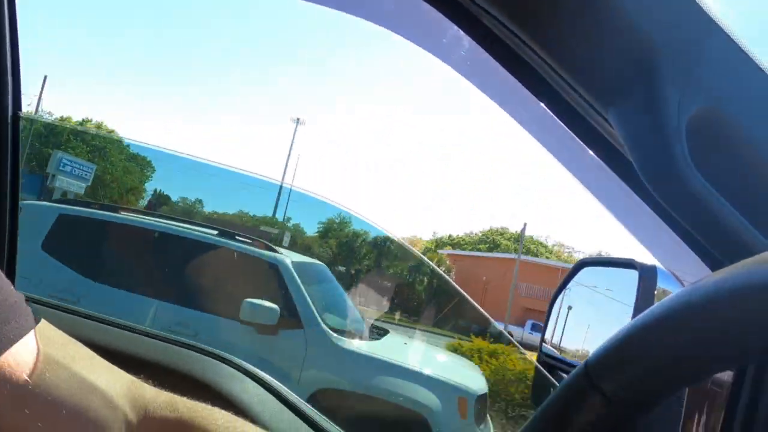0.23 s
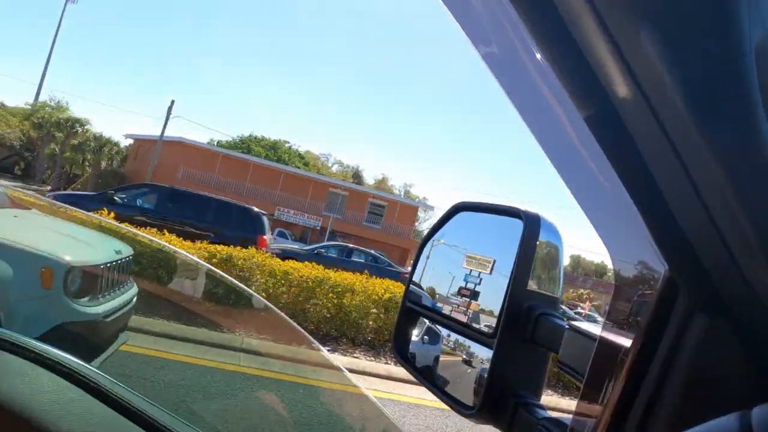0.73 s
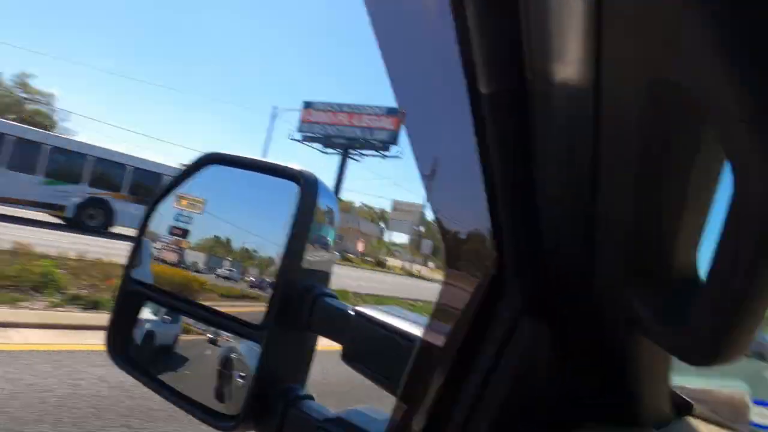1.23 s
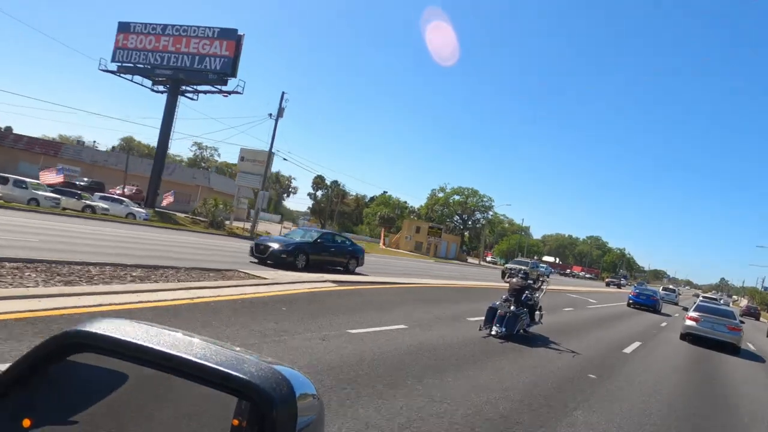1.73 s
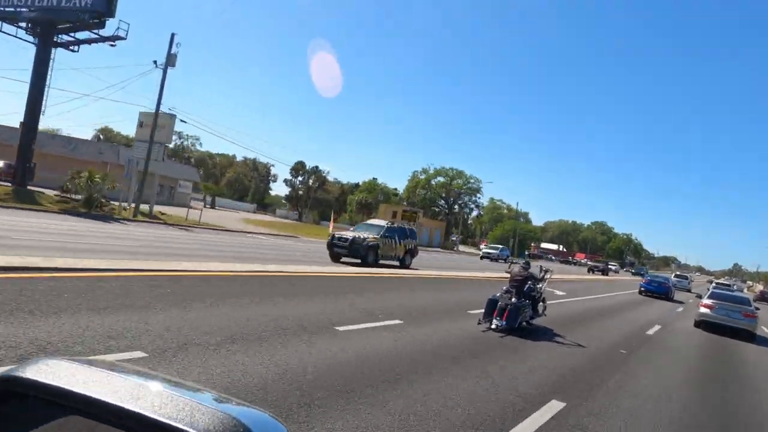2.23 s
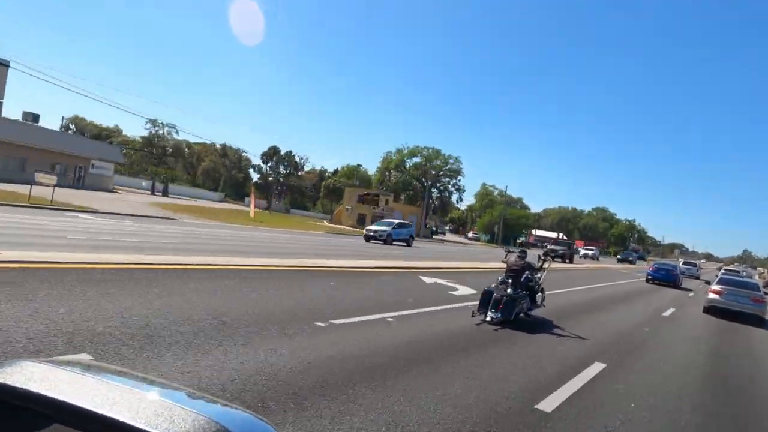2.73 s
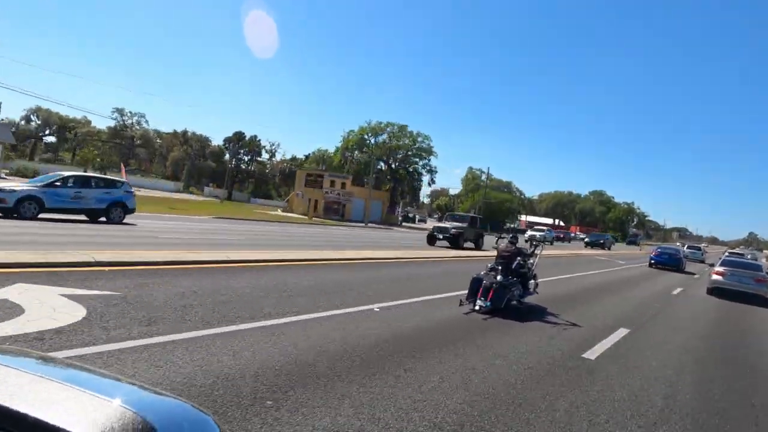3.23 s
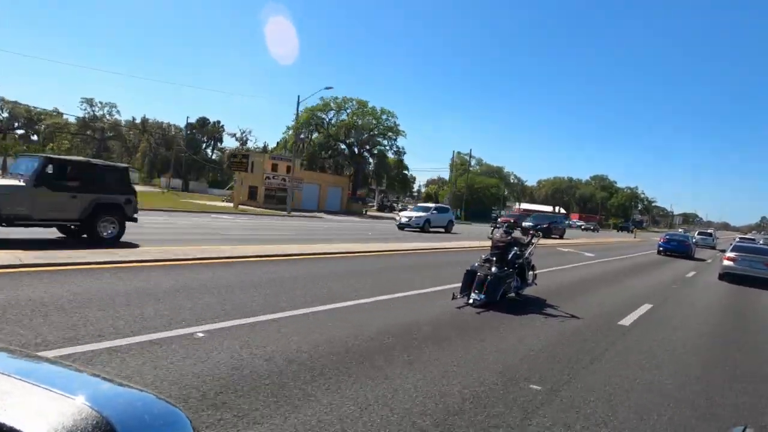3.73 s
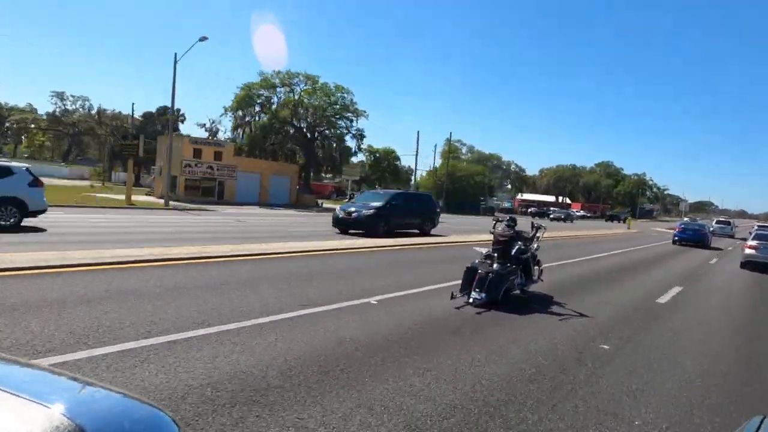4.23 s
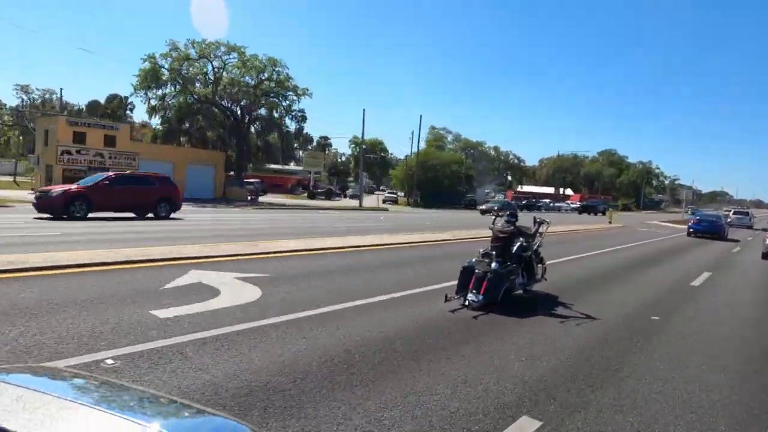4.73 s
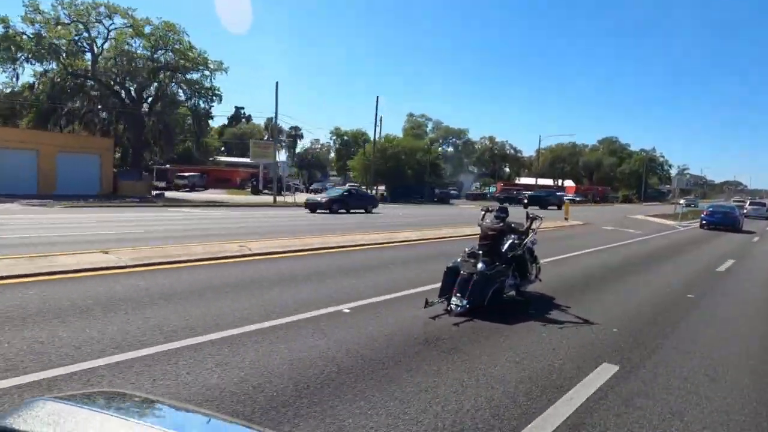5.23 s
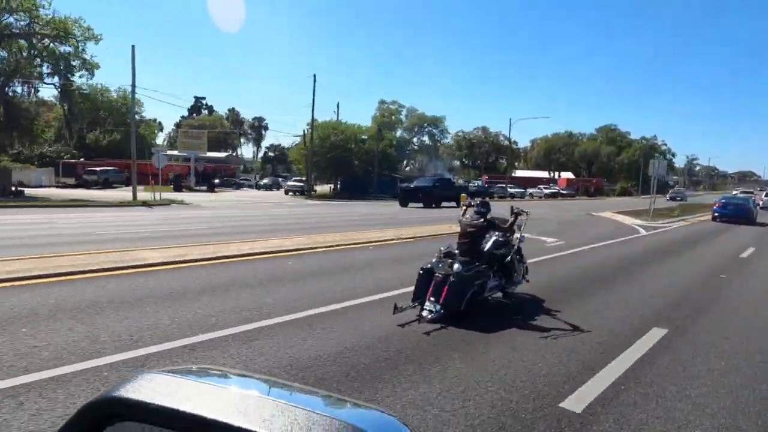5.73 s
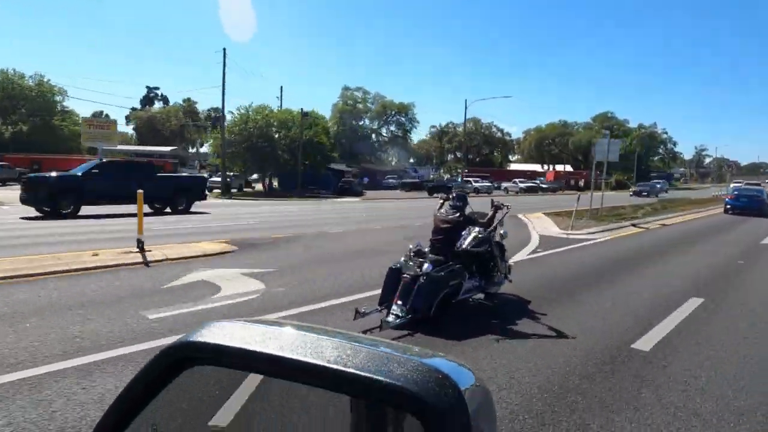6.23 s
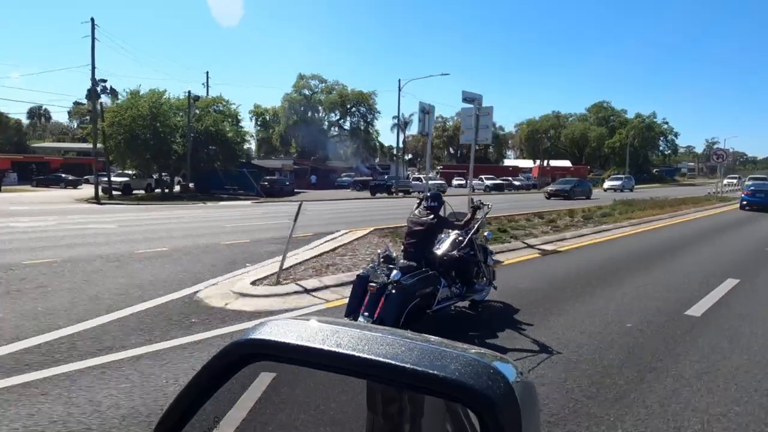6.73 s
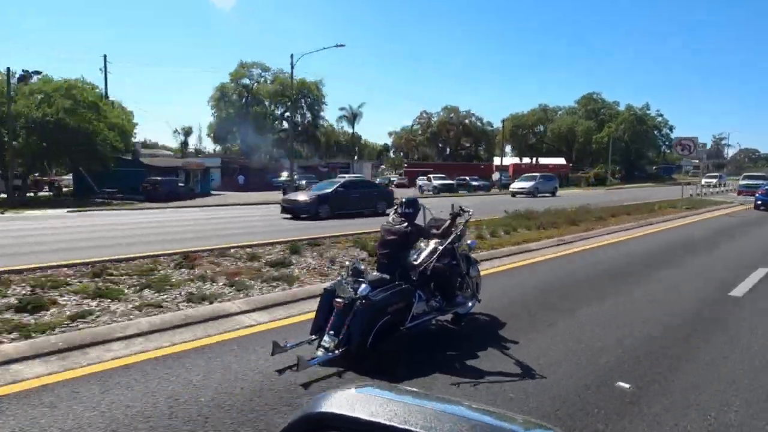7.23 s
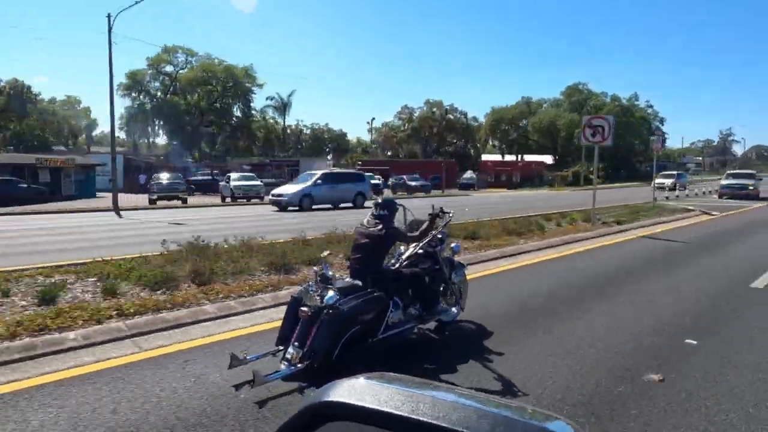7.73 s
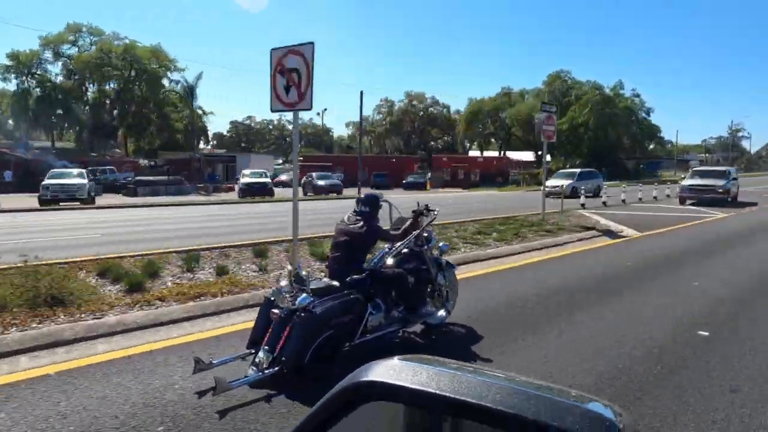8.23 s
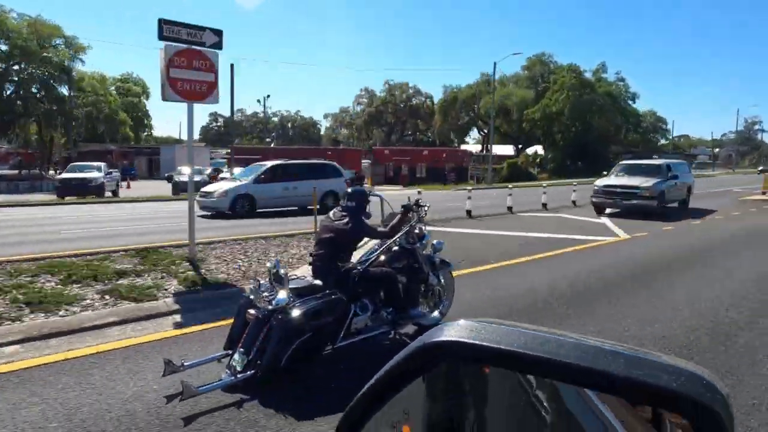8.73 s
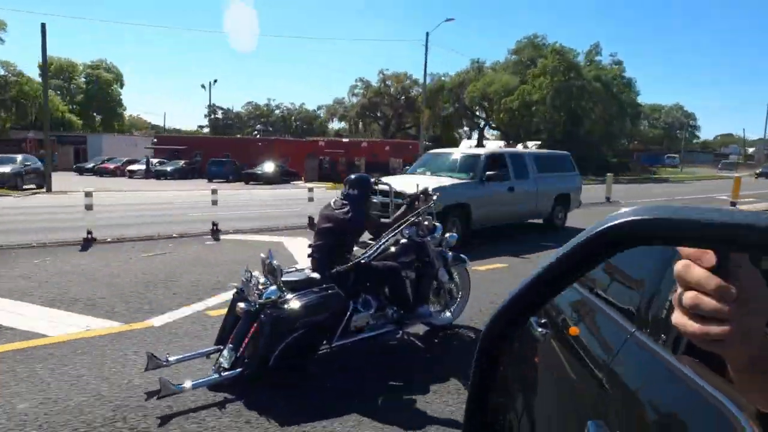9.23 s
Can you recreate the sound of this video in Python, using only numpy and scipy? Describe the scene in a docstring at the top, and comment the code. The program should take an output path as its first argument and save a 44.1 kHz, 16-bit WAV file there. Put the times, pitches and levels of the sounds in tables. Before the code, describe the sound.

A low road drone and window hiss are heard briefly from a truck's cab. Then the microphone is pushed outside with a blast of air, and heavy, fluttering wind batters it for the rest of the time, with tyre and traffic noise beneath. The rapid, lopsided crackle of a two-cylinder motorcycle nearby cuts through the gusts, builds, and drops away shortly before the end.

```python
"""First comes the boom of tyres, heard from the cab of a moving pickup through the opening window.
About 1.5 s in, the microphone is pushed out into the slipstream with a thump: eddies buffet it,
and air hisses and spits past its grille. A two-cylinder motorcycle runs alongside,
and the cracks of its uneven exhaust beat cut through the wind."""
import sys
import numpy as np
from scipy import signal
from scipy.fft import rfft, irfft, next_fast_len
from scipy.io import wavfile
from scipy.ndimage import uniform_filter1d, map_coordinates

SR = 44100
rng = np.random.default_rng(int(sys.argv[2]) if len(sys.argv) > 2 else 0)


def materialize(psi):
    """Save the field psi as 16-bit PCM at rate SR to the path in sys.argv[1].

    A 1-D psi becomes a single channel; in a 2-D psi each row is a channel.
    """
    bounded = np.clip(np.atleast_2d(psi).T, -1, 1)
    quanta = np.round(bounded * 32767).astype(np.int16)
    wavfile.write(sys.argv[1], SR, quanta)


N = 417186

# Wind on the microphone. Each row: time in seconds, then buffeting, hiss and sizzle levels in dB.
WIND_LEVELS = [(1.47, -10, -25, -50), (1.505, -14, -39, -45), (1.54, -10, -36, -43),
               (1.59, -8.5, -28.5, -39), (1.7, -13.5, -31.5, -38.5), (1.81, -16.5, -31, -33.5),
               (1.95, -19.5, -33, -34.5), (2.06, -20.5, -34.5, -37), (2.12, -17.5, -31, -43),
               (2.25, -21, -36, -47), (2.5, -14, -33.5, -45.5), (2.9, -18, -32.5, -40),
               (3.2, -13.5, -32.5, -45), (3.37, -15, -31.5, -39), (3.45, -17.5, -34.5, -49.5),
               (3.65, -17.5, -33, -39.5), (3.8, -17.5, -34, -48), (4.25, -14, -32.5, -43),
               (4.7, -16.5, -31.5, -42), (5.4, -16, -30.5, -40.5), (6.1, -15.5, -31, -40),
               (6.75, -16, -30.5, -39.5), (7.1, -13, -30.5, -38), (7.47, -20, -32, -39),
               (8.05, -14, -28.5, -35), (8.4, -16.5, -31.5, -38), (9, -14.5, -29.5, -40),
               (9.3, -16.5, -31.5, -41.5), (9.46, -12, -30.5, -45)]
# Eddies build and break off. Each row: peak time in seconds, buffeting lift in dB, hiss lift in dB.
GUST_LIFTS = [(1.52, 0, 0), (1.556, -5, 8.5), (1.59, 3, 5), (1.662, 1, 6.5), (1.695, 2.5, 6.5),
              (1.76, 1.5, 2), (1.8, 10, -1), (1.85, 4.5, 6), (1.91, 5, -1), (2.175, 7, -0.5), (2.49, 3, 4),
              (2.74, 12.5, -4), (2.85, 5, 2.5), (3.0, -3, 3.5), (3.07, 2, 5.5), (3.15, 3, 2),
              (4.059, 8.5, 4.5), (4.43, 2.5, 1), (4.85, 6, 1), (4.99, 5, -1), (5.08, 3.5, 0),
              (5.32, 7, 0.5), (5.38, -3, -2), (6.21, 5, 3), (6.31, 2, 2.5), (6.64, 1.5, 2.5),
              (6.95, 3, 2.5), (7.22, -1, 1), (7.275, -8, -2), (7.31, 7.5, -1), (7.41, 5, 0), (7.6, 8.5, 1),
              (7.789, 5, -0.5), (8.0, 3.5, 0), (8.556, 3, 5.5), (9.39, 2, 0.5)]
# The flow leaves the grille. Each row: time in seconds, depth in dB of which each band takes a share.
FLOW_LULLS = [(1.62, 16), (1.82, 6.5), (1.87, 7.5), (2.11, 10), (2.53, 9), (2.765, 10), (2.89, 8),
              (3.1, 5.5), (4.095, 9), (4.88, 7.5), (5.105, 2), (6.24, 3), (6.8, 7.5), (6.99, 12), (7.2, 9),
              (7.345, 6.5), (7.44, 5.5), (7.86, 3.5), (8.61, 5.5)]
# Hard eddies on the diaphragm. Each row: start in seconds, strength in dB.
HARD_EDDIES = [(1.511, -13.5), (1.541, -3.5), (1.652, -3), (1.838, -3.5), (1.889, -3.5), (2.057, -10),
               (2.248, -10.5), (2.17, -6), (2.354, -5.5), (2.729, -1), (2.904, -10.5), (2.991, -10),
               (4.048, -4), (4.187, -6.5), (4.41, -4.5), (4.676, -11), (5.366, 1), (5.414, -5),
               (5.579, -3.5), (6.421, -6), (6.772, -5), (6.912, -7), (6.96, -4.5), (7.011, -7.5),
               (7.155, -5.5), (7.274, -2.5), (7.312, -3.5), (8.388, -4), (8.89, -6)]
# Rasps at the grille. Each row: start in seconds, level in dB, length in seconds.
AIR_SPITS = [(1.523, -31, .006), (1.54, -26, 0.0047), (1.556, -32, 0.035), (1.654, -25.5, .012),
             (1.668, -26, 0.0056), (1.718, -30, 0.0045), (1.736, -31, 0.0065), (1.799, -24.5, .006),
             (1.807, -28.5, 0.0091), (1.954, -27, 0.018), (2.166, -29, 0.011), (2.349, -34.5, 0.0068),
             (2.709, -27.5, .008), (2.721, -29.5, 0.014), (2.937, -31.5, 0.014), (2.985, -33, .012),
             (3.075, -29.5, .008), (3.266, -26.5, .008), (4.433, -31.5, .008), (4.48, -27.5, 0.0095),
             (5.359, -31, .01), (6.422, -29, 0.0074), (6.913, -25.5, .008), (7.267, -25, .006),
             (7.298, -31, 0.0071), (7.414, -30.5, 0.0055), (7.647, -24, .006), (7.975, -24, .008),
             (8.238, -29, .01), (9.16, -32, 0.024), (9.382, -27, .025)]
# The exhaust alongside. Each row: time in seconds, crack strength in dB, snap strength in dB.
EXHAUST_LEVELS = [(1.9, -25, -43), (2.3, -14, -30), (3.2, -23.5, -34), (3.5, -16, -29), (3.8, -11.5, -24),
                  (4.15, -9, -25.5), (4.5, -9, -28), (5.2, -7, -23), (6, -6, -28.5), (6.6, -13.5, -33),
                  (7.3, -2, -33), (7.8, -3.5, -35), (8.2, -13, -37.5), (8.6, -34, -48)]
# Firings that snap harder. Each row: time in seconds, extra snap in dB.
HARD_FIRINGS = [(3.487, 15.5), (3.572, 7), (3.782, 2), (3.866, 6), (4.04, 6), (4.098, 4), (4.157, 9),
                (4.187, 5), (4.507, 7), (7.155, 11), (7.668, 8), (7.697, 14)]
# Inside the cab. Each row: time in seconds, then boom, tyre roar and window hiss levels in dB.
CAB_LEVELS = [(0, -23.5, -25.5, -34), (.45, -25, -26.5, -37.5), (.85, -26.5, -28, -38.5),
              (1.2, -24, -26, -37), (1.46, -22, -24, -35)]
# Small ticks of the cab's trim. Each row: start in seconds, level in dB, pitch in Hz.
TRIM_TICKS = [(.217, -38, 5800), (.665, -29, 4000), (.806, -44, 7000)]

# Tone colours at the microphone. Each row: frequency in Hz, relative level in dB.
BUFFET_SPECTRUM = [(41, -41.5), (70, -5.5), (118, 2), (221, 0.5), (373, -4), (501, -11.5), (600, -24.5),
                   (780, -22), (1320, -120)]  # large eddies
RUSH_SPECTRUM = [(290, -16.5), (500, -2.5), (1030, -12.5), (1400, -23), (1820, -51.5), (3080, -120)]  # small eddies and tyres
HISS_SPECTRUM = [(760, -7.5), (1300, 0.5), (2440, -2.5), (4500, -14.5), (5850, -33), (9900, -120)]  # air past the grille
SIZZLE_SPECTRUM = [(2600, -6.5), (4000, -2.5), (5000, -4.5), (7100, -14.5), (8700, -24), (11300, -36),
                   (13000, -43.5), (15000, -62.5), (17000, -120)]  # the top of the wind
SLAP_SPECTRUM = [(200, -38.5), (400, 6), (700, 4), (1300, -12.5), (2500, -16), (5000, -32), (9000, -51),
                 (15000, -100)]  # a hard eddy's puff
SPIT_SPECTRUM = [(600, -30), (1300, -2), (2500, 0), (4000, -6), (6000, -19), (9000, -40), (12500, -62),
                 (15000, -90)]  # rasping air
CRACK_SPECTRUM = [(1000, -39.5), (2200, -4.5), (3200, 3.5), (4800, -6.5), (6500, -15.5), (8000, -21.5),
                  (10000, -44.5), (12500, -54), (15000, -80)]  # an exhaust pulse
SNAP_SPECTRUM = [(2500, -26.5), (4000, -2), (5500, 1), (7500, -9.5), (10000, -27), (13000, -34.5),
                 (15000, -49.5)]  # its bright edge
BOOM_SPECTRUM = [(12, -55), (25, -20), (60, -15.5), (100, -13.5), (135, -6.5), (165, -4.5), (200, -7),
                 (300, -11), (450, -21), (600, -49), (900, -120)]  # cab air and body
ROAR_SPECTRUM = [(240, -35), (400, -7.5), (548, -14), (596, -4.5), (680, -7), (830, -7), (950, -11.5),
                 (1500, -23.5), (1950, -51), (3300, -120)]  # tyres from inside
GAP_SPECTRUM = [(760, -19), (1300, -1), (1620, 2.5), (2200, 0), (4000, -10), (6000, -18), (8700, -33),
                (11300, -42.5), (13000, -55), (15000, -72), (17000, -120)]  # air at the window gap
CHASSIS_SPECTRUM = [(12, -36), (20, -14.5), (40, -2.5), (60, 5), (85, -3.5), (140, -62.5), (300, -140)]  # chassis rumble
ROAD_SPECTRUM = [(53, -30.5), (90, -11.5), (150, 1.5), (226, -2.5), (376, 1), (1070, -22.5), (4000, -34.5),
                 (5200, -62.5), (8800, -120)]  # tyres and traffic from outside
SWISH_SPECTRUM = [(1500, -30), (1850, -2), (2100, -1), (2500, -22), (3700, -28), (4150, -6),
                  (4600, -35), (7000, -100)]  # air near the sill
WHISTLE_SPECTRUM = [(2600, -30), (3300, -3), (4000, 0), (4900, -20), (7000, -80)]  # a breathy tone

SILL_S = 1.49  # the microphone crosses the window sill


def wind():
    """Out in the slipstream, eddies on the grille shake four bands together, over a bed of road noise."""
    buffet_db, hiss_db, sizzle_db = curves(WIND_LEVELS)
    rush_db = -1.5 + .53 * buffet_db + .47 * hiss_db
    low_lift, high_lift = (bumps([(s, lifts[k]) for s, *lifts in GUST_LIFTS], .013, .0052)
                           for k in range(2))
    lull = bumps(FLOW_LULLS, before_s=.024, after_s=.017)
    buffet_db += low_lift - .85 * lull
    rush_db += .74 * (low_lift + high_lift) - .6 * lull
    hiss_db += high_lift - .36 * lull
    sizzle_db += .5 * high_lift - .23 * lull
    heave, slow, quick, flutter = wobble(11), wobble(28), wobble(60), wobble(150)
    sound = road(swell_db=.8 * slow)
    swell_db = .1 * heave + slow + 1.6 * quick + .7 * flutter
    sound += amp(buffet_db) * noise(BUFFET_SPECTRUM, swell_db)
    swell_db = .3 * heave + 1.2 * slow + .3 * quick + 1.1 * flutter
    sound += amp(rush_db) * noise(RUSH_SPECTRUM, swell_db, patchy_db=.6)
    swell_db = .19 * heave + .75 * slow + .41 * quick + 1.34 * flutter
    sound += amp(hiss_db) * noise(HISS_SPECTRUM, swell_db, patchy_db=.9)
    swell_db = .41 * wobble(8) + .6 * slow + .54 * quick + flutter
    sound += amp(sizzle_db) * noise(SIZZLE_SPECTRUM, swell_db, patchy_db=1.85)
    return sound * np.sqrt(outside())


def slaps():
    """A hard eddy hits the microphone: a puff and a swing or two of the diaphragm. Weak ones are random."""
    puffs, thuds, t = np.zeros(N + SR), np.zeros(N + SR), np.arange(900) / SR
    when, strength = rng.random((380, 2)).T
    weak_eddies = np.c_[SILL_S + (N / SR - SILL_S) * when, -15 - 2.5 * np.log(strength + .05)]
    swing = (t / .004) ** 2 * np.exp(2 - 2 * t / .004)  # peaks after 4 ms
    for s, db in np.r_[HARD_EDDIES, weak_eddies]:
        add(puffs, s, amp(db - 1) * swing * rng.standard_normal(len(t)))
        detune, phase = rng.standard_normal(2)
        hz = 220 * np.exp(.284 * detune)
        add(thuds, s, amp(db - 3) * swing * np.sin(2 * np.pi * (hz * t + phase)))
    thuds = filtered(thuds[:N], lambda hz: hz ** 2 / (110 ** 2 + hz ** 2))  # bass cut
    return coloured(puffs[:N], SLAP_SPECTRUM) + thuds


def spits():
    """Short rasps of air right at the grille start sharply and break off."""
    level = np.zeros(N + SR)
    for s, db, length_s in AIR_SPITS:
        progress = np.arange(round(length_s * SR)) / (length_s * SR)
        add(level, s, amp(db) * np.sqrt(np.sin(np.pi * progress ** .86)))
    return level[:N] * noise(SPIT_SPECTRUM, 1.5 * wobble(300))


def firing_times():
    """Two cylinders fire unevenly, once a cycle each, as the engine slowly gains speed."""
    anchor_s, cycle_hz, gain_hz_per_s = 2.2527, 16.9205, .12694  # a firing, and the cycle rate there
    second_lag = .45  # share of a cycle
    s = np.arange(EXHAUST_LEVELS[0][0], EXHAUST_LEVELS[-1][0], .01)
    cycles_run = cycle_hz * (s - anchor_s) + gain_hz_per_s / 2 * (s - anchor_s) ** 2
    cycles = np.arange(-5, 109)
    return np.interp(np.r_[cycles, cycles + second_lag], cycles_run, s)


def motorcycle():
    """Alongside, each firing gives a crack, a bright snap, a ping of the pipe's tip and a low thump."""
    tip_hz, upper_hz, thump_hz = 4580, 6900, 210
    cracks, snaps, thumps = np.zeros((3, N))
    t = np.arange(1500) / SR
    crack_shape = strike(t, rise_s=.001, decay_s=.008, power=2)
    snap_shape = strike(t, rise_s=.00033, decay_s=.0066)
    thump = -np.sin(2 * np.pi * thump_hz * t) * strike(t, rise_s=.0023, decay_s=.029)
    times, crack_levels, snap_levels = np.transpose(EXHAUST_LEVELS)
    for s in firing_times():
        crack_db, snap_db = np.interp(s, times, crack_levels), np.interp(s, times, snap_levels)
        snap_db += sum(db for at, db in HARD_FIRINGS if abs(s - at) < .01)
        size, detune, ring, upper_ring = rng.standard_normal(4)
        ping = amp(-13 + 2.5 * ring) * np.sin(2 * np.pi * tip_hz * np.exp(.07 * detune) * t)
        ping += amp(-17 + 3.2 * upper_ring) * np.sin(2 * np.pi * upper_hz * np.exp(.07 * ring) * t)
        crack = crack_shape * (rng.standard_normal(len(t)) + ping)
        snap = snap_shape * (rng.standard_normal(len(t)) + amp(7.5) * ping)
        add(cracks, s - .0012, amp(crack_db + 1.9 * size) * crack)
        add(snaps, s - .0012, amp(snap_db + 2.2 * size) * snap)
        add(thumps, s, amp(crack_db - 3.5) * thump)
    return coloured(cracks, CRACK_SPECTRUM) + coloured(snaps, SNAP_SPECTRUM) + thumps


def sill():
    """At the sill a swish grows, the first blast thumps with rising pitch, and a breathy tone follows."""
    start_s, length_s = 1.484, .118  # of the blast
    t = np.arange(N) / SR
    approach = np.exp(np.minimum(t - SILL_S, 0) / .12) * (1 - outside())
    swish = amp(-34.5) * approach * noise(SWISH_SPECTRUM)
    age = np.clip(t - start_s, 0, length_s)
    shape = np.sqrt(np.abs(np.sin(np.pi * (age / length_s) ** .94))) * (age < length_s)
    thump, deep_push = (-9.5, 99.7, 245, .03), (-12.5, 40.3, 124.2, .045)
    blast = 0
    for db, from_hz, toward_hz, glide_s in (thump, deep_push):
        hz = toward_hz - (toward_hz - from_hz) * np.exp(-age / glide_s)
        hz *= 1 + .071 * wobble(60)
        blast += amp(db + 2.9 * wobble(50)) * sine(hz * (age > 0))
    whistle = amp(-43) * bumps([(2.05, 1)], before_s=.06, after_s=.025) * noise(WHISTLE_SPECTRUM)
    return swish + shape * blast + whistle


def cab():
    """From inside: road noise in the cab's resonances, window hiss, engine drone and ticking trim."""
    boom_db, roar_db, hiss_db = curves(CAB_LEVELS)
    drone = amp(-31 + 1.5 * wobble(4.1)) * sine(hz=156 + 1.2 * wobble(14.9))
    sound = drone + amp(boom_db) * noise(BOOM_SPECTRUM) + amp(roar_db) * noise(ROAR_SPECTRUM)
    sound += amp(hiss_db) * noise(GAP_SPECTRUM, 1.26 * wobble(30.85))
    t = np.arange(2000) / SR
    tick_shape = strike(t, rise_s=.0011, decay_s=.049, power=2)
    for s, db, hz in TRIM_TICKS:
        rasp = unit(signal.fftconvolve(rng.standard_normal(len(t)), np.hanning(30), "same"))
        add(sound, s, amp(db) * tick_shape * rasp * np.sin(2 * np.pi * hz * t))
    return sound * np.sqrt(1 - outside())


def road(swell_db):
    """Behind the wind, the chassis rumbles under steady tyres and traffic."""
    return amp(-35) * noise(CHASSIS_SPECTRUM, swell_db) + amp(-30) * noise(ROAD_SPECTRUM)


def outside():
    """Microphone position: 0 in the cab, 1 in the slipstream, crossing in 30 ms."""
    return np.clip((np.arange(N) / SR - SILL_S) / .03 + .5, 0, 1)


def amp(db):
    """dB to gain."""
    return 10 ** (np.asarray(db) / 20)


def unit(x):
    """Scaled to rms 1."""
    return x / np.sqrt(np.mean(x ** 2) + 1e-20)


def add(track, start_s, sound):
    """Mix a sound into the track."""
    track[round(start_s * SR):][:len(sound)] += sound


def sine(hz):
    """A tone of moving pitch."""
    return np.sin(2 * np.pi * np.cumsum(hz) / SR)


def strike(t, rise_s, decay_s, power=1):
    """A quick rise times a fall of 60 dB per decay_s."""
    return (1 - np.exp(-t / rise_s)) ** power * amp(-60 * t / decay_s)


def curves(rows):
    """One value per sample for each column after the time."""
    times, *columns = np.transpose(rows)
    return [np.interp(np.arange(N) / SR, times, column) for column in columns]


def bumps(rows, before_s, after_s):
    """Sum of lopsided bell shapes. Each row: time in seconds, height."""
    t = np.arange(0, N, 32) / SR
    total = sum(height * np.exp(-.5 * ((t - s) / np.where(t < s, before_s, after_s)) ** 2)
                for s, height in rows)
    return np.interp(np.arange(N) / SR, t, total)


def wobble(rate):
    """A smooth random curve, rate knots a second."""
    return map_coordinates(rng.standard_normal(int(N * 400 / SR)), [np.arange(N) * rate / SR])


def filtered(x, response):
    """x through a gain that depends on frequency."""
    size = next_fast_len(N + 8192)
    return irfft(rfft(x, size) * response(np.fft.rfftfreq(size, 1 / SR)), size)[..., :N]


def coloured(x, spectrum):
    """x through (Hz, dB) points on a log axis."""
    points_hz, db = np.transpose(spectrum)
    return filtered(x, lambda hz: amp(np.interp(np.log(hz + 1), np.log(points_hz), db)))


def noise(spectrum, swell_db=0, patchy_db=0):
    """Noise of rms 1, swelling in time and with patches of random gain."""
    white = rng.standard_normal(N)
    if patchy_db:
        frames = signal.stft(white, nperseg=256)[2]
        patches = uniform_filter1d(uniform_filter1d(rng.standard_normal(frames.shape), 5, 0), 12, 1)
        white = signal.istft(frames * amp(patchy_db * unit(patches)), nperseg=256)[1][:N]
    return unit(coloured(white * amp(swell_db), spectrum))


def scene():
    """One microphone: in the cab, then out in the wind beside the motorcycle."""
    return (cab() + wind() + slaps() + spits() + motorcycle() + sill())[None]


def record(dry):
    """The microphone softly clips the strongest blasts and passes nothing above its band limit."""
    ceiling, top_hz = .93, 15100
    clipped = dry / (1 + np.abs(dry / ceiling) ** 8) ** (1 / 8)
    return filtered(clipped, lambda hz: hz < top_hz)


dry = scene()
out = record(dry)
materialize(out)
```